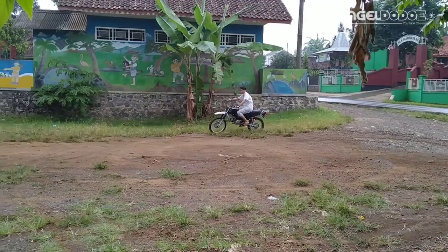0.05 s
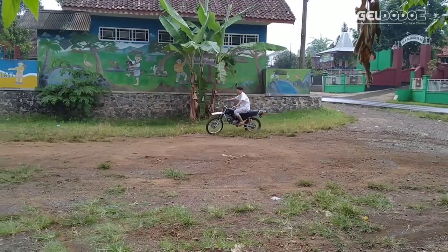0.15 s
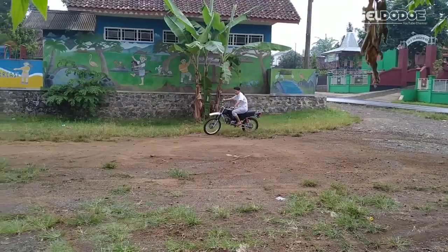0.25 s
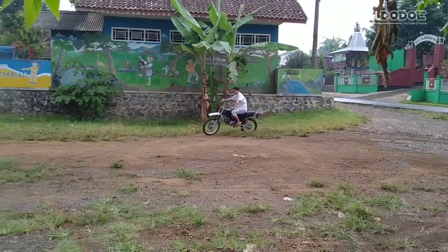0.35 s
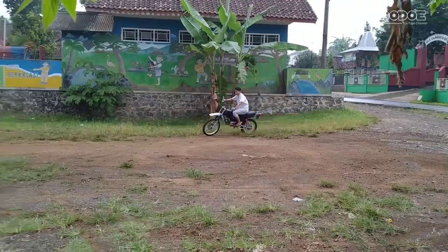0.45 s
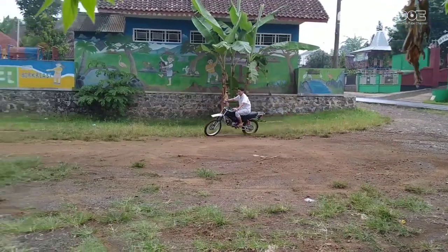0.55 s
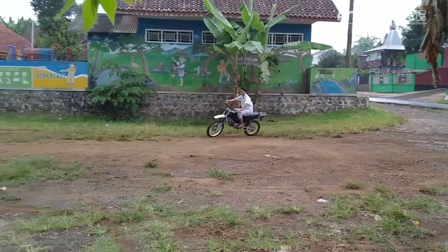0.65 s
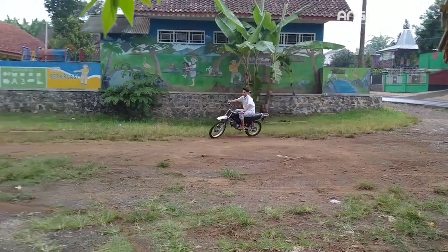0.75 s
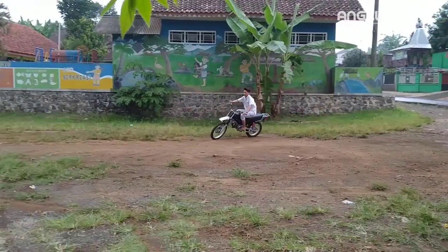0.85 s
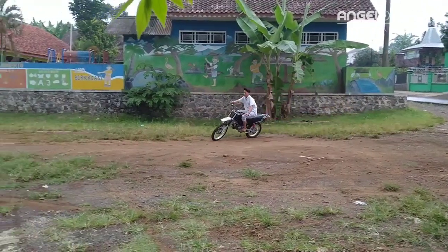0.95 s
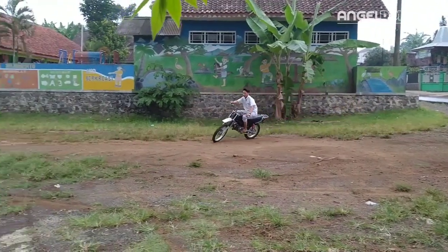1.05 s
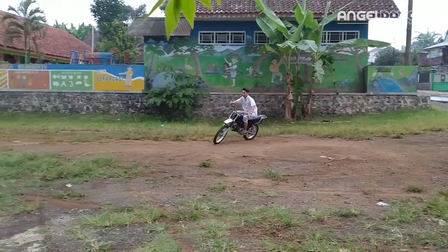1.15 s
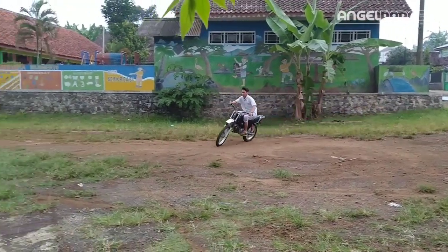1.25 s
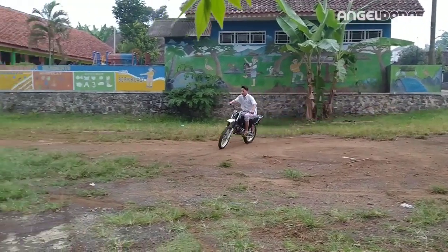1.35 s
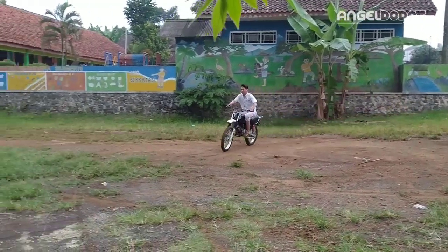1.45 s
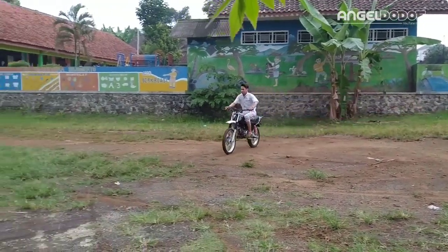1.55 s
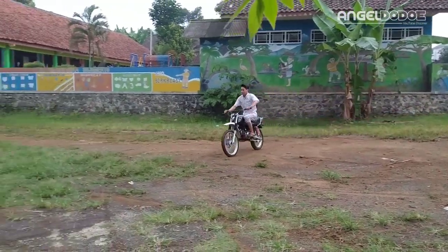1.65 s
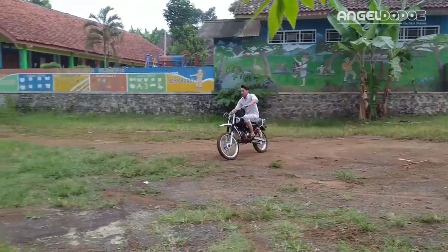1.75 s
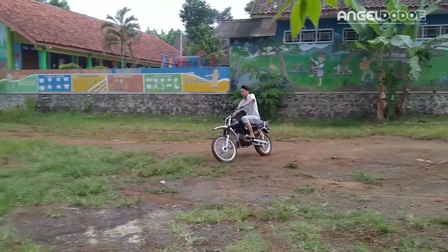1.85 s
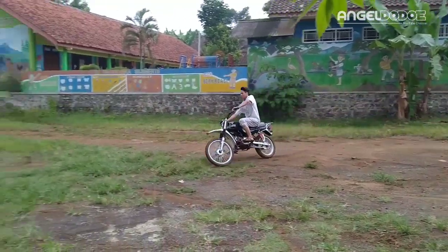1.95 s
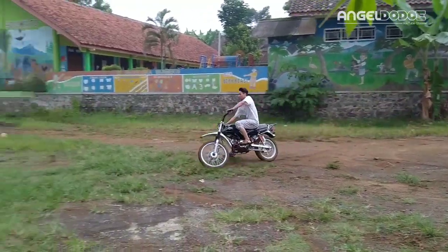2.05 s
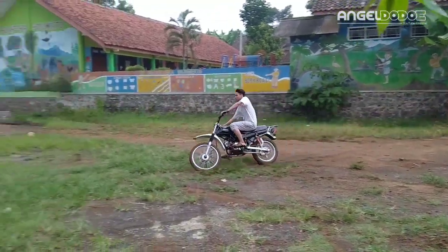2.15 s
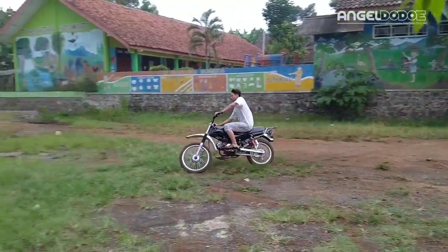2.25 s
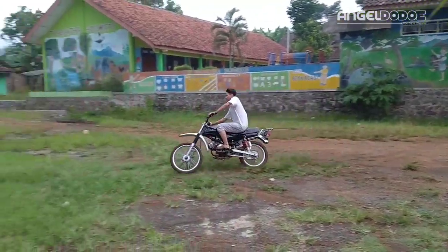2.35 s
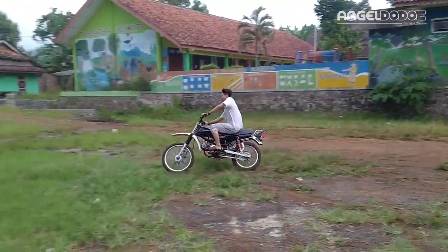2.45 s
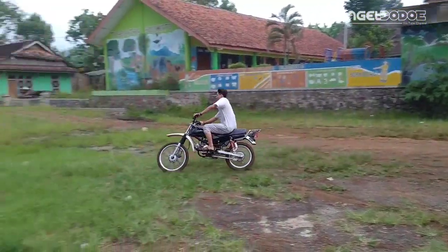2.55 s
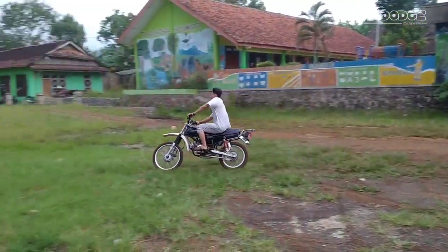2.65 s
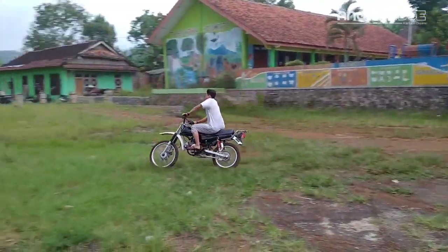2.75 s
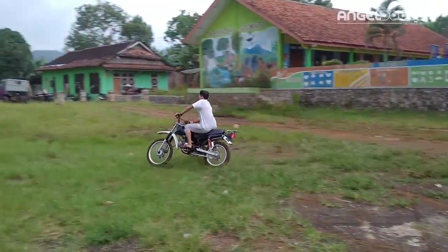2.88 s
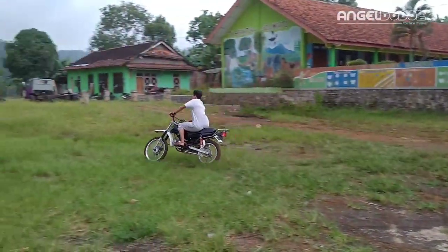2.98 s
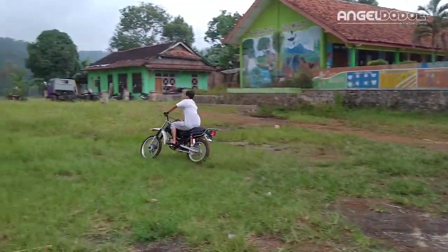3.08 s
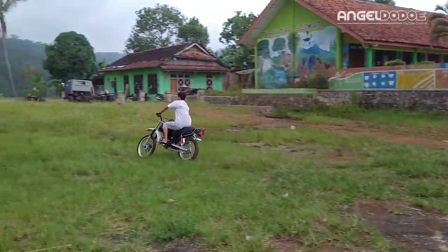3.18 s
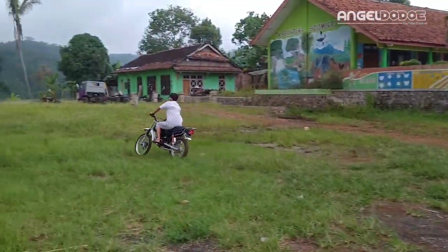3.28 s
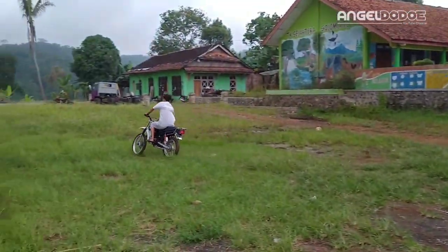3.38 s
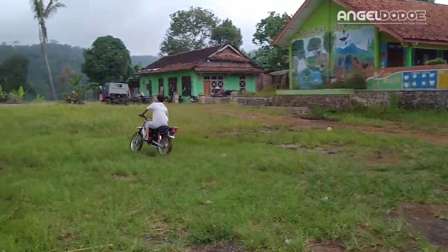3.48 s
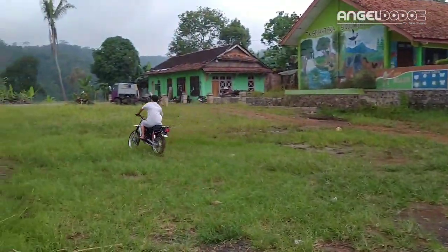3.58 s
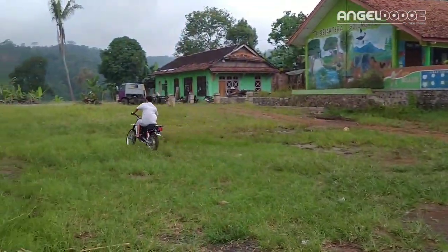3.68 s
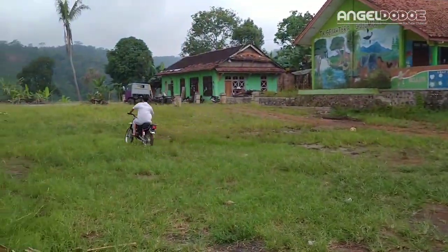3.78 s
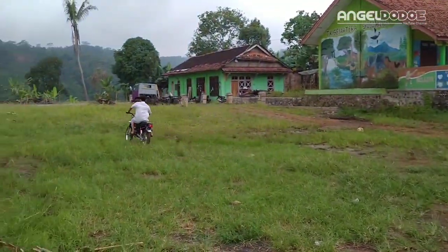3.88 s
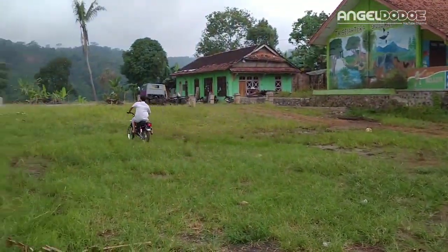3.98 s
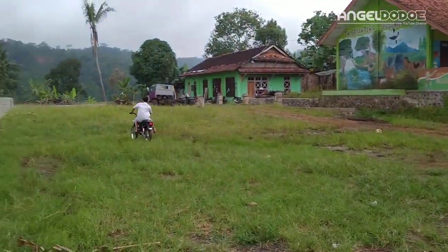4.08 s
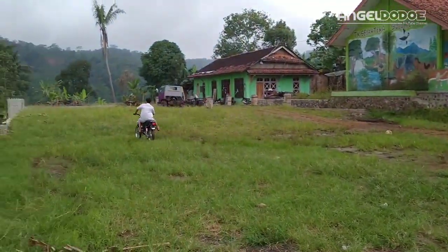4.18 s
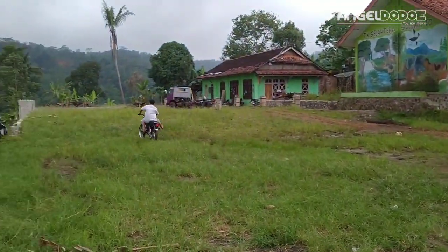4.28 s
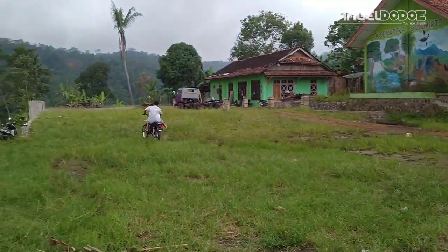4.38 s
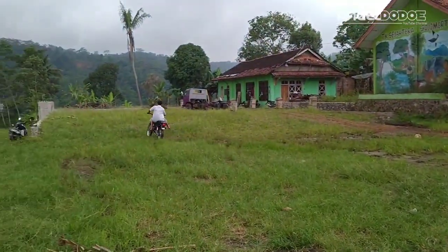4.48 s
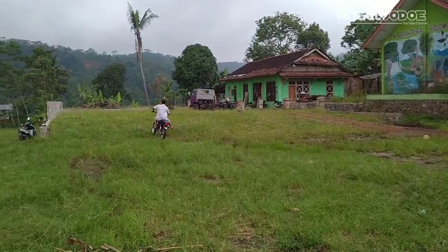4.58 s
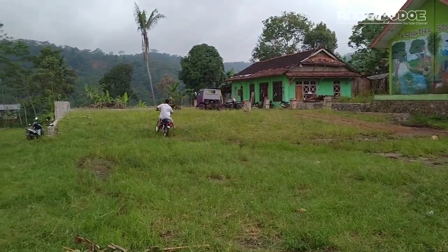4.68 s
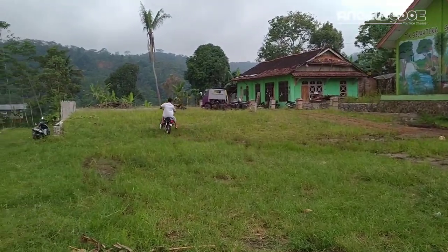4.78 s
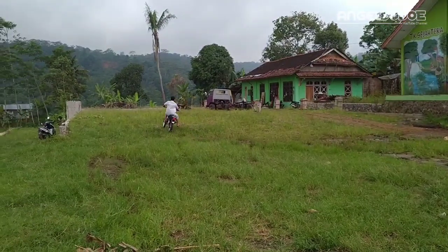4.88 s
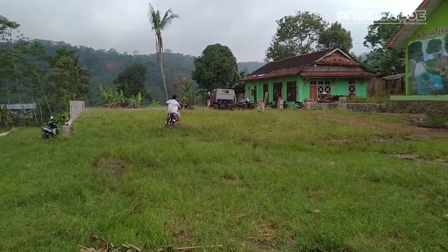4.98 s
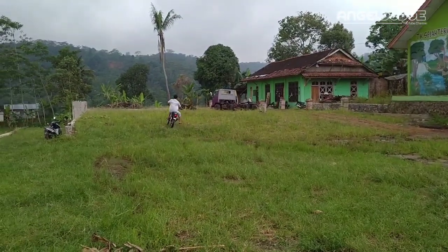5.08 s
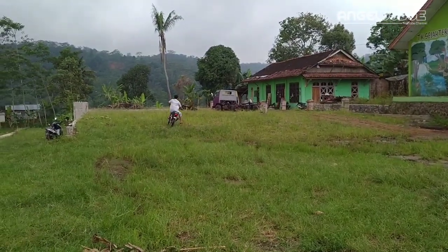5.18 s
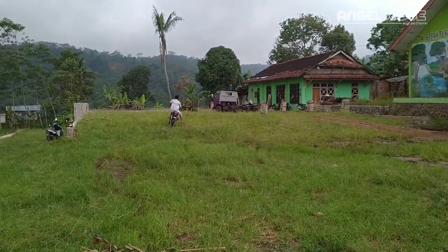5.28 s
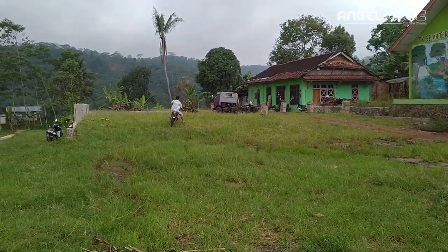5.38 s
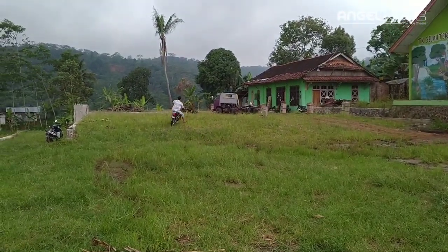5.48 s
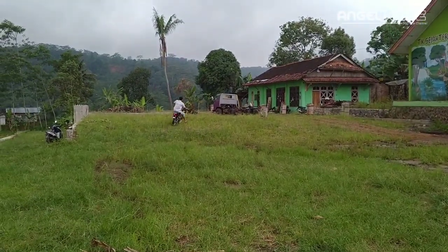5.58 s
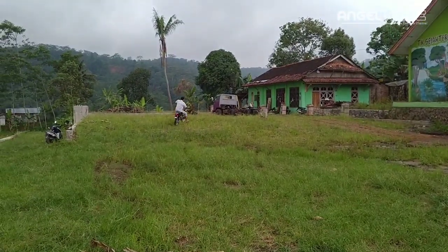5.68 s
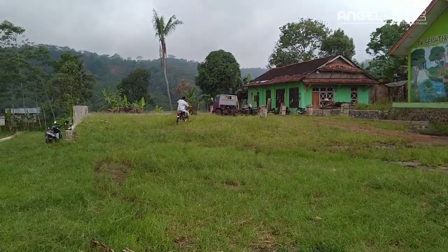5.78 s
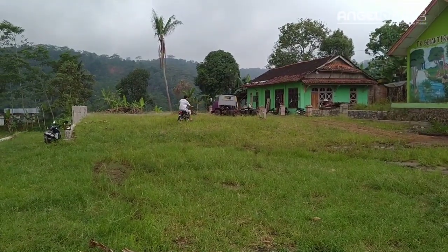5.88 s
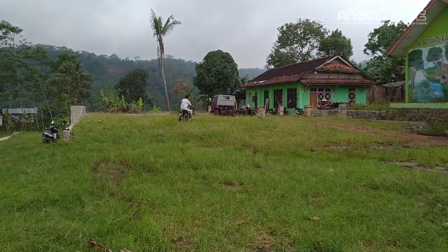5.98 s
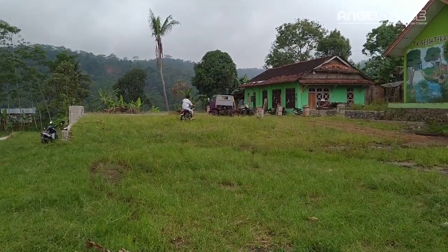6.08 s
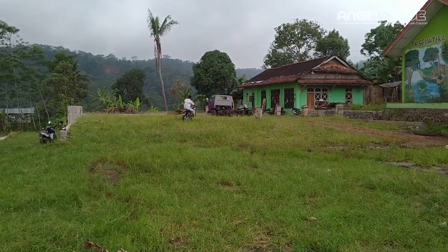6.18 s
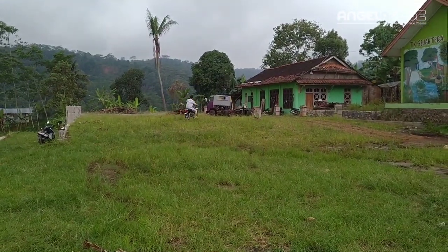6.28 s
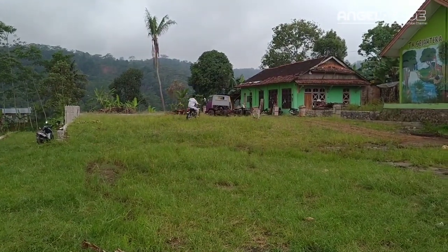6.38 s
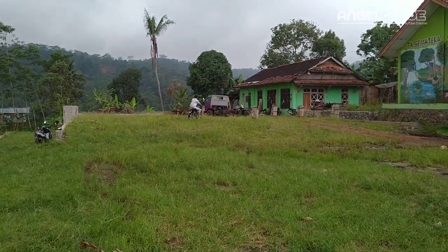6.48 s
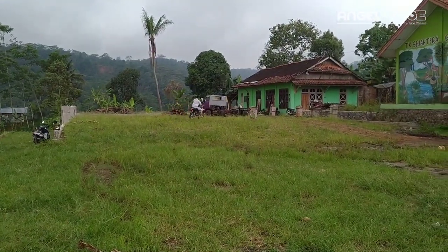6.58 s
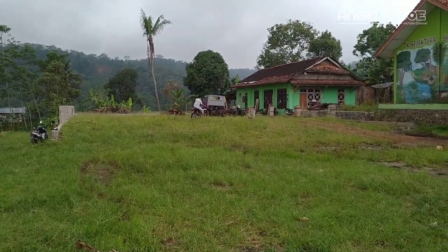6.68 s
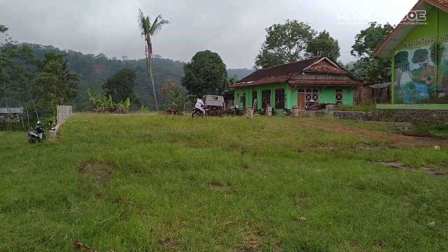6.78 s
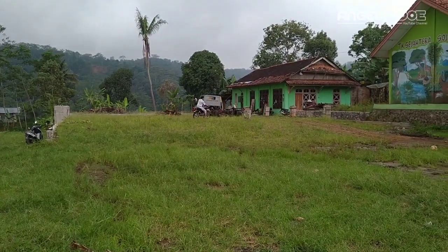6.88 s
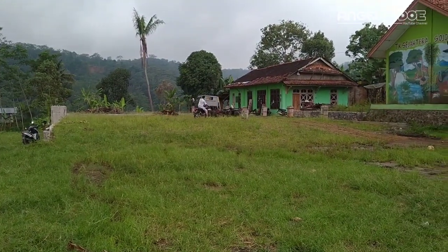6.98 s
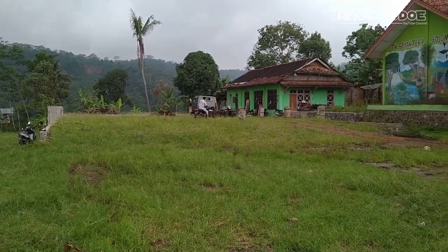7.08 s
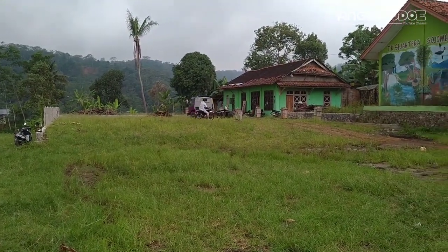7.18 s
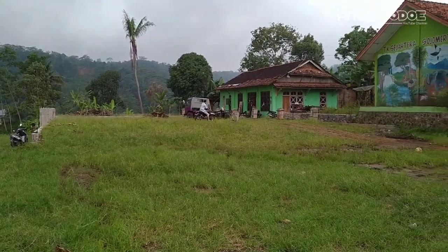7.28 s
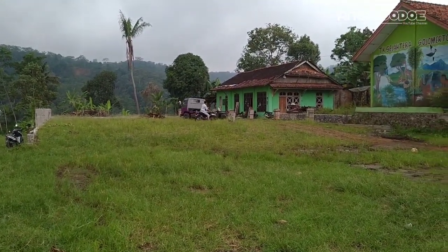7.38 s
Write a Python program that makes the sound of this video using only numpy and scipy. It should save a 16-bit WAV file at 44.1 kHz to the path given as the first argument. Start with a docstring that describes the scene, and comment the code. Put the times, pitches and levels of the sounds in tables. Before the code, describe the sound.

Outdoors, heard through a thin small microphone, a trail bike circles past with a hollow, barking exhaust drone, metallic clatter and fizzing hiss. The throttle opens and closes in turns, so loud pulls alternate with softer humming overrun. It moves off, becoming duller, stutters with several quick misfires, and drops to a low, uneven idle. Light reflections from buildings, a quiet rustle and low rumble lie beneath.

```python
"""The uneven throbbing drone of a single-cylinder trail motorcycle comes first; it circles a grass yard and rides off.
Its throttle opens and shuts in turns, with brief misfires. Each firing excites damped pipe modes; noise gated by the
engine cycle gives growl, clatter and treble hiss. Walls answer with decaying diffuse noise, and shaped noise makes
the yard's rustle and a low rumble. A wavering sine squeaks once. A small microphone with little deep bass listens."""
import sys
import numpy as np
from scipy import signal
from scipy.fft import rfft, irfft, next_fast_len
from scipy.io import wavfile
from scipy.ndimage import uniform_filter1d, map_coordinates

SR = 44100
rng = np.random.default_rng(int(sys.argv[2]) if len(sys.argv) > 2 else 0)


def inscribe(sig):
    """Save sig as 16-bit PCM at rate SR to the path in sys.argv[1].

    A 1-D sig is mono; a 2-D sig holds one channel per row.
    Samples are clipped to [-1, 1] before scaling.
    """
    pcm = np.round(np.clip(np.atleast_2d(sig).T, -1, 1) * 32767)
    wavfile.write(sys.argv[1], SR, pcm.astype(np.int16))


def convert_level_to_amplitude(level_db):
    """Map a level in decibels to its linear amplitude factor."""
    exponent = np.asarray(level_db, float) / 20
    return 10 ** exponent


N = 328104


def unit(x):
    """Normalisation: scale to an rms value of 1."""
    return x / np.sqrt(np.mean(x ** 2) + 1e-20)


def along(points, hz):
    """Logarithmic interpolation: (f/Hz, value) points read on a log frequency axis."""
    f, v = np.transpose(points)
    return np.interp(np.log(hz + 1), np.log(f + 1), v)


def curves(rows):
    """Linear interpolation in time: one value per sample for each column after t/s."""
    s, *columns = np.transpose(rows)
    return [np.interp(np.arange(N) / SR, s, column) for column in columns]


def wobble(rate):
    """Slow random modulation: a smooth curve through rate random knots a second."""
    knots = rng.standard_normal(int(N * rate / SR) + 4)
    return map_coordinates(knots, [np.arange(N) * rate / SR])


def filtered(x, response):
    """Linear filtering: the spectrum of x times a complex response of frequency."""
    m = next_fast_len(N + SR // 2)
    return irfft(rfft(x, m) * response(np.fft.rfftfreq(m, 1 / SR)), m)[..., :N]


def noise(spectrum, patchy_db):
    """Coloured noise of rms 1 whose narrow, short-lived patches stand out like small parts ringing."""
    z = signal.stft(rng.standard_normal(N), nperseg=1024)[2]
    field = uniform_filter1d(rng.standard_normal(z.shape), size=3, axis=0)
    field = uniform_filter1d(field, size=5, axis=1)
    patchy = signal.istft(z * convert_level_to_amplitude(patchy_db * unit(field)), nperseg=1024)[1][:N]
    return unit(filtered(patchy, lambda hz: convert_level_to_amplitude(along(spectrum, hz))))


def ring(at, gain, modes, stretch, linger, attack):
    """Modal excitation: each firing starts damped sines anew; gain sets the train's rms, attack is in s."""
    t = np.arange(SR // 8) / SR
    rows = 0
    for hz, t60, db in modes:
        decay = convert_level_to_amplitude(db - 60 * t / (t60 * linger[:, None]))
        rows = rows - decay * np.sin(2 * np.pi * hz * stretch[:, None] * t)
    rows = rows * (1 - np.exp(-t / attack)) ** 2
    spacing = np.gradient(uniform_filter1d(at.astype(float), size=3, mode="nearest")) + 1
    rows = rows * (gain * np.sqrt(spacing / np.sum(rows ** 2, axis=1)))[:, None]
    places = at[:, None] + np.arange(len(t))
    return np.bincount(places.ravel(), rows.ravel(), N + len(t))[:N]


# Firing rate of the engine: t/s, f/Hz
FIRING_RATE = [(0.0, 33.01), (0.54, 36.89), (0.72, 33.89), (0.97, 38.83), (1.26, 48.19), (1.49, 50.17),
               (1.86, 43.1), (1.96, 35.91), (2.2, 36.37), (2.55, 43.73), (2.71, 41.88), (3.02, 43.94),
               (3.53, 35.82), (3.7, 37.59), (4.12, 33.68), (4.39, 40.92), (4.7, 36.27), (4.89, 38.03),
               (5.12, 31.22), (5.45, 27.14), (5.74, 36.71), (6.0, 39.13), (6.28, 28.6), (6.42, 29.35),
               (6.55, 24.05), (6.9, 20.66), (7.13, 23.13), (7.44, 22.54)]
# Unevenness of firing, greatest near 6.1 s and again towards the end: t/s, share (0-1)
RAGGED = [(0, .05), (1.85, .07), (2, .15), (2.3, .06), (5, .08), (5.9, .12), (6.1, .4), (6.3, .15),
          (6.5, .2), (7.44, .35)]


def firings():
    """Phase accumulation: a firing at each whole engine cycle, with scattered timing and strength."""
    rate, ragged = curves(FIRING_RATE)[0], curves(RAGGED)[0]
    cycle = np.cumsum(rate) / SR + 0.2016
    at = np.append(0, np.flatnonzero(np.diff(np.floor(cycle))))  # the engine is already running
    chance = rng.standard_normal((len(at), 2))
    late = .07 * ragged[at] * chance[:, 0] * SR / rate[at]
    size = convert_level_to_amplitude(6 * ragged[at] * chance[:, 1])
    return cycle, np.clip(at + late.astype(int), 0, N - 1), size


# Stretches of strong firing; the brief dips from 5.8 to 6.3 s are misfires, the earlier ones a shut throttle:
# start t/s, length t/s, bark level/dB at the start, bark level/dB at the end, factor on the loss after it (about 0-1)
STRONG_FIRING = [(-.1, 1.67, -27, -27, 0.49), (1.839, 1.367, -27, -28.5, 0.64),
                 (3.554, 0.11, -25, -24, 0.69), (4.139, .88, -26.5, -27, 1.04),
                 (5.492, 0.214, -35, -26, 0.67), (5.82, .2, -27, -27, 0.7), (6.05, 0.181, -28, -34.5, 0.37),
                 (6.271, 0.18, -26.5, -53, 0.88)]
# Loss before that factor: a step with this time constant, plus a steady sag, limited to the deepest value
STEP_S, STEP_DB, SAG_DB_PER_S, DEEPEST_DB = 0.013, 13, 27.5, 27.5


def drive():
    """Source strength: bark of the present or last stretch of strong firing, and loss since it ended, in dB."""
    t = np.arange(N) / SR
    stretch = np.searchsorted(np.transpose(STRONG_FIRING)[0], t) - 1
    start, length, first_db, last_db, factor = np.transpose(STRONG_FIRING)[:, stretch]
    since = np.maximum(t - start - length, 0)
    fall_db = STEP_DB * (1 - np.exp(-since / STEP_S)) + SAG_DB_PER_S * since
    strong_db = first_db + (last_db - first_db) * np.clip((t - start) / length, 0, 1)
    return strong_db, factor * np.minimum(fall_db, DEEPEST_DB)


# Pipe modes before tuning and damping vary: f/Hz, t60/s, level/dB within the group
BOOM_MODES = [(155, .1, 0)]
THROB_MODES = [(193.4, 0.093, 0)]
DRONE_MODES = [(236.6, 0.098, 3.5), (308.8, 0.12, 9.5), (407, 0.05, 0)]
BARK_MODES = [(487.6, 0.037, -1.5), (655.2, 0.073, -10.5), (765, 0.039, -24), (857, 0.0048, -1.5)]
# Swelling and sinking of the two lowest modes: t/s, boom level/dB, throb level/dB
LOW_LEVELS = [(0.0, -17, -29.5), (0.33, -18.5, -23.5), (0.52, -30.5, -33.5), (0.72, -24.5, -17.5),
              (0.79, -23, -40), (0.91, -17.5, -24.5), (1.28, -21.5, -21), (1.37, -38, -15),
              (1.44, -15, -21.5), (1.86, -14, -22), (2.05, -27.5, -25), (2.17, -16.5, -24),
              (2.57, -20, -23), (2.73, -16.5, -45), (2.84, -18, -21.5), (3.17, -20, -25), (3.54, -20, -40),
              (3.6, -21.5, -24.5), (4.1, -22, -37), (4.16, -19.5, -27.5), (4.39, -24.5, -22),
              (4.65, -21, -25.5), (4.93, -23, -24.5), (5.14, -26, -34), (5.46, -33.5, -38),
              (5.54, -17, -38), (5.7, -22, -21.5), (5.78, -24.5, -33), (5.94, -17.5, -23.5),
              (6.02, -36, -25), (6.06, -20.5, -25), (6.2, -20.5, -37), (6.24, -26, -25), (6.29, -20, -32),
              (6.44, -25.5, -32.5), (6.51, -55, -45), (6.76, -33.5, -49), (6.84, -46, -50),
              (6.88, -24, -57), (6.98, -35, -59), (7.05, -38.5, -50), (7.44, -43.5, -60)]
# Distance and heading, during strong firing: t/s, drone level/dB, intake growl level/dB,
# engine clatter level/dB, treble hiss level/dB
RIDE = [(0, -23.5, -47, -46.5, -54.5), (.5, -20, -51, -45, -52.5), (.9, -25, -45, -44, -53.5),
        (1.2, -18.5, -38.5, -38, -53.5), (1.5, -26, -37, -40, -53.5), (1.9, -21.5, -42, -41.5, -51.5),
        (2.2, -19.5, -36.5, -36.5, -52.5), (2.6, -17, -36.5, -35.5, -52), (2.9, -21.5, -38.5, -36.5, -49),
        (3.3, -27.5, -49, -40, -47.5), (3.6, -22, -46, -42.5, -47), (4.15, -25.5, -55.5, -45, -50),
        (4.9, -23, -47.5, -43, -50), (5.55, -24, -57.5, -42, -52.5), (5.95, -25, -54, -42, -54.5),
        (6.4, -30.5, -54.5, -41, -56), (7.44, -35.5, -43.5, -37.5, -45)]
# Distance and heading: t/s, tuning of boom and throb as heard (ratio),
# level/dB of the middle two bark modes over the outer two
HEADING = [(0, 1.125, -11.5), (.9, 1.03, -15), (1.3, 1.046, -14), (1.9, 0.955, -8), (2.2, 1.05, -12),
           (2.8, 1.027, -9.5), (3.6, 0.991, -0.5), (5, 1, -6), (7.44, 0.957, -8.5)]
DRONE_FOLLOWS = 0.48  # share of the loss in dB
IDLE_HZ, IDLE_DAMPING = 29.3, 1.6  # below this firing rate the ring dies sooner; exponent
COOLING, BARK_COOLING = 0.137, 0.13  # fall in tuning ratio once the loss has reached its step
WARM_UP_S = 0.099  # time constant with which hot gas restores the tuning afterwards


def exhaust(at, size):
    """Pipe resonance: firings strike low and high modes as hard as drive and heading allow."""
    boom_db, throb_db = (c[at] for c in curves(LOW_LEVELS))
    strong_db, loss_db = drive()
    bark_db = (strong_db - loss_db)[at]
    drone_db = curves(RIDE)[0][at] - DRONE_FOLLOWS * loss_db[at]
    tuning, middle_db = (c[at] for c in curves(HEADING))
    rate = curves(FIRING_RATE)[0][at]

    weak = np.clip(loss_db / STEP_DB, 0, 1)
    keep = np.exp(-1 / (WARM_UP_S * SR))
    chill = np.maximum(weak, signal.lfilter([1 - keep], [1, -keep], weak))[at]  # cools at once, warms slowly
    stretch = np.maximum(rate / 38, .85) ** 0.44  # hotter, faster gas lifts the pipe's tuning
    low_stretch = stretch * tuning
    drone_stretch = stretch * (1 - COOLING * chill)
    bark_stretch = stretch ** .5 * (1.025 - BARK_COOLING * chill)

    # strong outflow damps the pipe; on the overrun it hums on
    linger = convert_level_to_amplitude(np.clip(-.25 * (bark_db - boom_db + 11), -4, 4))
    linger = linger * np.minimum(rate / IDLE_HZ, 1) ** IDLE_DAMPING

    boom = ring(at, size * convert_level_to_amplitude(boom_db), BOOM_MODES, low_stretch, linger, attack=0.00082)
    throb = ring(at, size * convert_level_to_amplitude(throb_db), THROB_MODES, low_stretch, linger, attack=0.0013)
    drone = ring(at, size * convert_level_to_amplitude(drone_db), DRONE_MODES, drone_stretch, linger, attack=0.0013)
    outer = ring(at, size * convert_level_to_amplitude(bark_db), BARK_MODES[::3], bark_stretch, linger, attack=.0012)
    middle = ring(at, size * convert_level_to_amplitude(bark_db + middle_db), BARK_MODES[1:3], bark_stretch, linger, attack=.0012)
    return boom + throb + drone, outer + middle


def thin_bass(x):
    """Steep high-pass: the low pipe modes lose their deepest bass below about 111 Hz."""
    return filtered(x, lambda hz: (-hz ** 2 / (111 ** 2 - hz ** 2 + 1j * 111 * hz)) ** 3)


def silencer(x):
    """Side-branch resonator: a side chamber swallows a share of the sound near its own pitch."""
    pitch_hz, width_hz, takes = 397, 80, 0.25
    return filtered(x, lambda hz: 1 - takes * 1j * hz * width_hz / (pitch_hz ** 2 - hz ** 2 + 1j * hz * width_hz))


def bursts(cycle, lag, fall):
    """Periodic gating: a gate snaps open lag cycles after the firing, at a new strength each time, then sags."""
    strength = convert_level_to_amplitude(2 * rng.standard_normal(400))[np.floor(cycle - lag + 1).astype(int)]
    return uniform_filter1d(strength * np.exp(-((cycle - lag) % 1) / fall), size=60)


# Intake growl spectrum: f/Hz, relative level/dB per Hz
GROWL = [(600, -26), (760, 2.5), (950, 3.5), (1150, 2.5), (1350, -7), (1700, -31.5)]


def intake_growl(growl_db, chatter):
    """Amplitude modulation: low-mid noise at the intake beats with the engine cycle."""
    return convert_level_to_amplitude(growl_db) * unit(chatter * noise(GROWL, patchy_db=1.5))


# Valve gear and engine clatter spectrum: f/Hz, relative level/dB per Hz
CLATTER = [(790, -29), (1350, -7.5), (1440, -8.5), (1600, 5.5), (1890, -3), (2460, -2.5), (2730, -4.5),
           (3620, -6), (4820, -19), (6000, -23.5), (7800, -49), (13200, -120)]
# The same heard from behind: f/Hz, relative level/dB per Hz
CLATTER_BEHIND = [(790, -39.5), (1350, -3.5), (1540, -1.5), (1890, -2.5), (2520, -2), (3530, -14.5),
                  (5530, -25), (6000, -37), (7800, -62), (13200, -120)]
# Power share of the clatter heard from behind: t/s, share (0-1)
RECEDING = [(0, 0), (4, 0), (5.6, 1), (7.44, 1)]


def engine_clatter(clatter_db, chatter):
    """Directivity: cycle-gated metallic noise crosses at equal power to its spectrum from behind."""
    far = curves(RECEDING)[0]
    metal = np.sqrt(1 - far) * noise(CLATTER, patchy_db=2.0)
    metal = metal + np.sqrt(far) * noise(CLATTER_BEHIND, patchy_db=1.5)
    return convert_level_to_amplitude(clatter_db + 0.2 * wobble(9)) * unit(chatter * metal)


# Treble hiss spectrum: f/Hz, relative level/dB per Hz
HISS = [(3240, -61), (5500, -16), (6670, -4.5), (7650, 1), (8430, 1), (9710, -3), (10500, -1.5),
        (12000, -15), (15600, -35), (22000, -120)]
# Very top of the hiss: f/Hz, relative level/dB per Hz
SNAP = [(9000, -42), (11500, 5.5), (13500, 4.5), (15000, 3.5), (17000, -6.5)]


def treble_hiss(hiss_db, load, cycle):
    """Gated noise: treble hiss in two bursts per engine cycle, perhaps rattle or microphone overload."""
    gate = .25 + load * (1.3 * bursts(cycle, lag=.03, fall=.13) + .4 * bursts(cycle, lag=.58, fall=.3))
    hiss = unit(gate * noise(HISS, patchy_db=5.5))
    snap = unit(gate ** 1.4 * noise(SNAP, patchy_db=6.0))  # the very top comes mostly at the firing
    snap_db = -9.5 + 4.0 * curves(RECEDING)[0]
    return convert_level_to_amplitude(hiss_db + 0.52 * wobble(11)) * (hiss + convert_level_to_amplitude(snap_db) * snap)


# Share of the loss in dB that each layer follows
GROWL_FOLLOWS, CLATTER_FOLLOWS, HISS_FOLLOWS = .4, 0.22, 0.69


def clatter_and_hiss(cycle):
    """Load dependence: growl, clatter and hiss sink with the drive, and their beat smooths out."""
    loss_db = uniform_filter1d(drive()[1], size=900)
    follows = [GROWL_FOLLOWS, CLATTER_FOLLOWS, HISS_FOLLOWS]
    growl_db, clatter_db, hiss_db = curves(RIDE)[1:] - np.outer(follows, loss_db)
    load = np.clip((hiss_db + 66) / 14, 0, 1)
    beat = 1.1 * bursts(cycle, lag=0.021, fall=0.13) + 0.2 * bursts(cycle, lag=0.715, fall=0.25)
    chatter = 0.63 + load * beat
    growl = intake_growl(growl_db, chatter)
    return growl + engine_clatter(clatter_db, chatter) + treble_hiss(hiss_db, load, cycle)


# Strength of the walls' answer relative to the engine, highest at the end: t/s, level/dB
WALL_STRENGTH = [(0, -17), (.5, -14.5), (3.2, -15.5), (3.6, -19), (5, -18), (6.3, -22), (7.44, -6.5)]
# Decay of the walls' answer: f/Hz, t60/s
WALL_DECAY = [(100, 1), (800, 0.49), (3000, 0.035)]


def walls(low, bark):
    """Diffuse reflection: buildings answer with decaying noise, drawn anew each third of a second as the rider moves."""
    x = convert_level_to_amplitude(curves(WALL_STRENGTH)[0]) * (low + convert_level_to_amplitude(5) * bark)  # walls return the shorter waves better
    out, hop = np.zeros(N + 2 * SR), SR // 3
    for start in range(-hop, N, hop):
        hz, t, z = signal.stft(rng.standard_normal(SR // 2), SR, nperseg=512)
        decay = convert_level_to_amplitude(-60 * t / along(WALL_DECAY, hz)[:, None])
        tail = signal.istft(z * decay, SR, nperseg=512)[1]
        window = np.hanning(2 * hop)[max(0, -start):]
        piece = window * np.pad(x, (0, 2 * hop))[max(0, start):start + 2 * hop]
        answer = signal.fftconvolve(piece, tail / np.linalg.norm(tail))
        out[max(0, start) + 900:][:len(answer)] += answer  # delayed by 900 samples, 20 ms
    return out[:N]


# Distant rustle spectrum: f/Hz, relative level/dB per Hz
YARD = [(210, -28), (350, 2.5), (922, -9), (1250, 1.5), (1530, -21), (2040, 0.5), (2430, -10),
        (2890, -11.5), (3790, -13), (4880, -29), (6600, -23.5), (8510, -16.5), (15600, -49)]


def yard_rustle():
    """Background noise: a distant rustle of coloured noise with a slowly wandering level."""
    return convert_level_to_amplitude(-46.5 + 0.8 * wobble(3.4)) * noise(YARD, patchy_db=2.5)


# Low rumble spectrum, peaking near 42 Hz, about the firing rate: f/Hz, relative level/dB per Hz
RUMBLE = [(12, -14), (25, -4), (42, 0), (58, -6), (85, -6), (130, -40), (200, -120)]
# Rumble strength before its random wander: t/s, level/dB
RUMBLE_LEVEL = [(0, -45), (.8, -51), (1.7, -43), (3.1, -44), (3.6, -46), (4.1, -55), (4.9, -46), (5.4, -59),
                (5.9, -50), (6.85, -60), (7.44, -57)]


def low_rumble():
    """Narrow low-frequency noise: an uneven rumble, perhaps engine and wind together."""
    return convert_level_to_amplitude(curves(RUMBLE_LEVEL)[0] + 1.5 * wobble(6)) * noise(RUMBLE, patchy_db=1.5)


# A thin metallic squeak before its wavering: start t/s, end t/s, f/Hz, peak level/dB
SQUEAK = (3.315, 3.41, 14640, -63)


def squeak():
    """Phase and amplitude modulation: a short, wavering high sine."""
    start, end, hz, db = SQUEAK
    t = np.arange(N) / SR
    shape = np.clip(np.minimum(t - start, end - t) / .02, 0, 1)  # 20 ms ramps
    return convert_level_to_amplitude(db + 3 * wobble(60)) * shape * np.sin(2 * np.pi * hz * t + 0.9 * wobble(80))


def scene():
    """Superposition: motorcycle, walls, yard, rumble and squeak add as pressures."""
    cycle, at, size = firings()
    low, bark = exhaust(at, size)
    low, bark = silencer(thin_bass(low)), silencer(bark)
    motorcycle = low + bark + clatter_and_hiss(cycle)
    return (motorcycle + walls(low, bark) + yard_rustle() + low_rumble() + squeak())[None]


def roll_off(x):
    """The treble ends steeply here."""
    return signal.sosfilt(signal.butter(12, 15700, fs=SR, output="sos"), x)


def record(dry):
    """High-pass response: the small microphone drops the deepest bass, below about 25 Hz."""
    heard = filtered(dry, lambda hz: (1j * hz / (25 + 1j * hz)) ** 2)
    return roll_off(heard)


dry = scene()
out = record(dry)
inscribe(out)
```